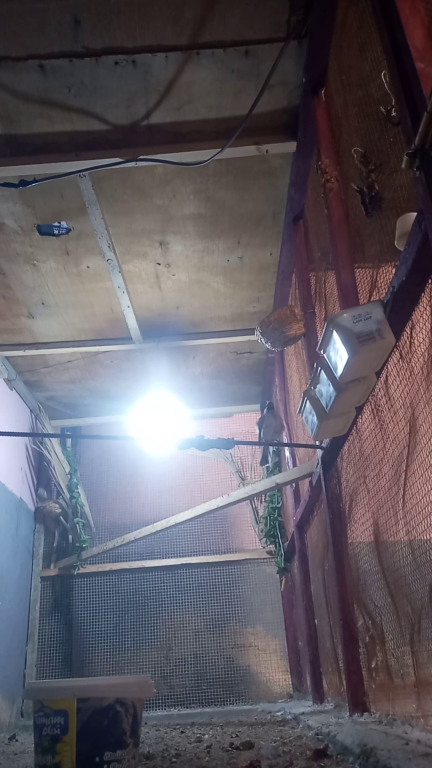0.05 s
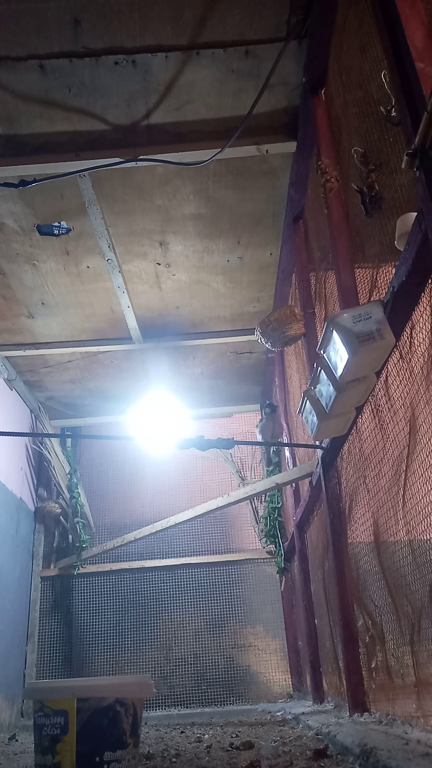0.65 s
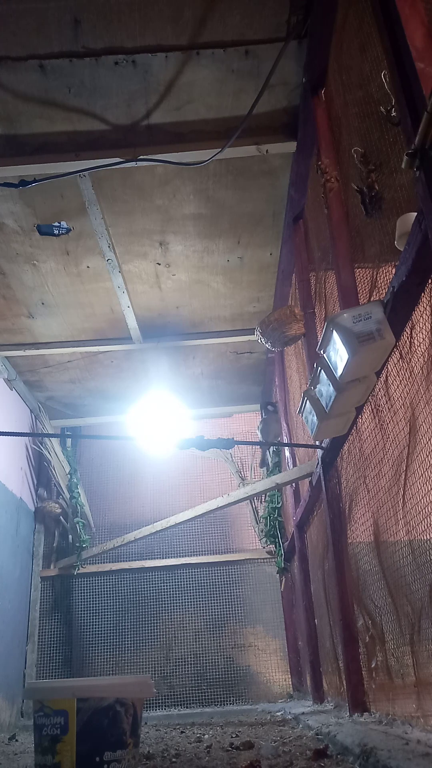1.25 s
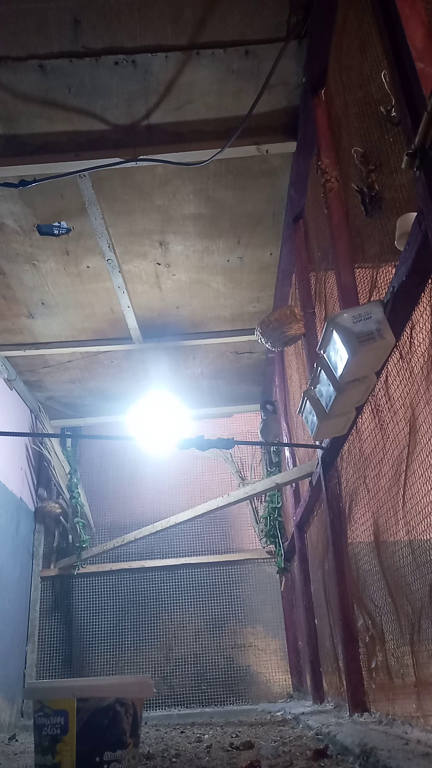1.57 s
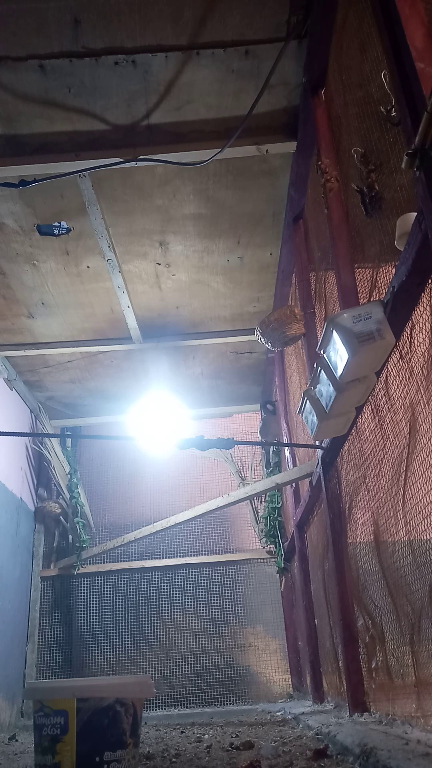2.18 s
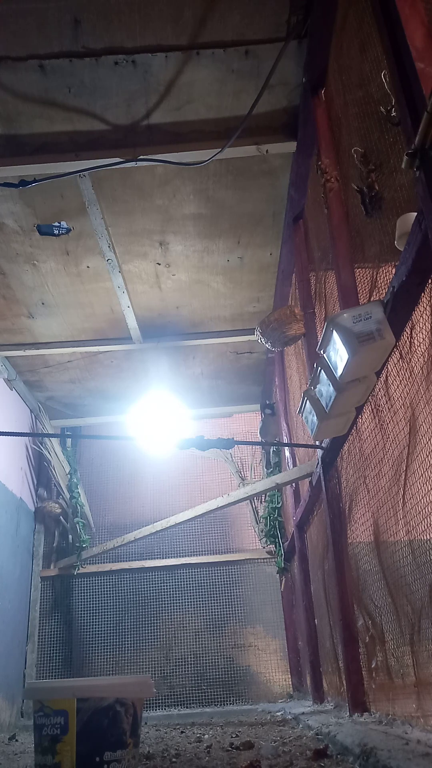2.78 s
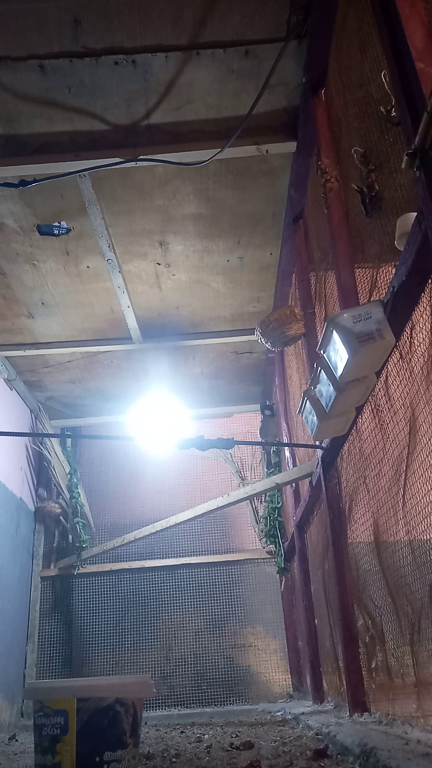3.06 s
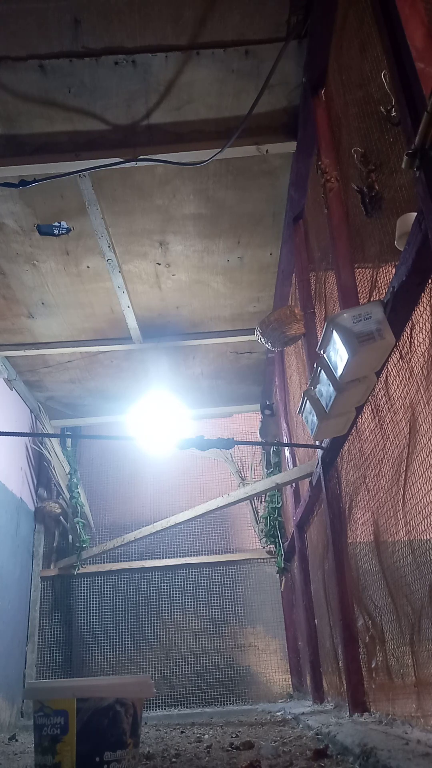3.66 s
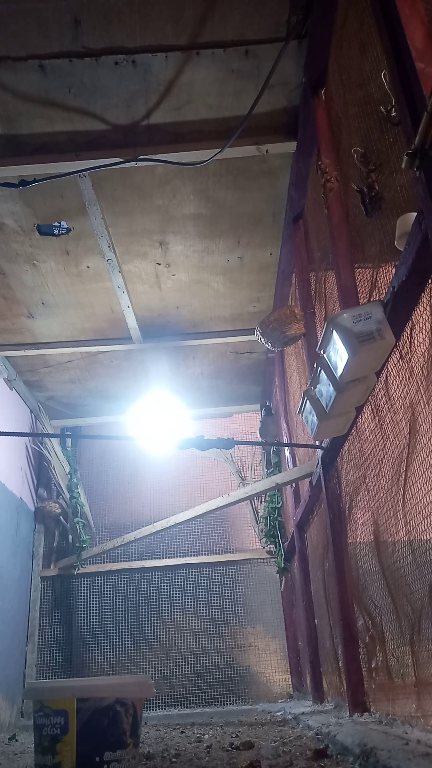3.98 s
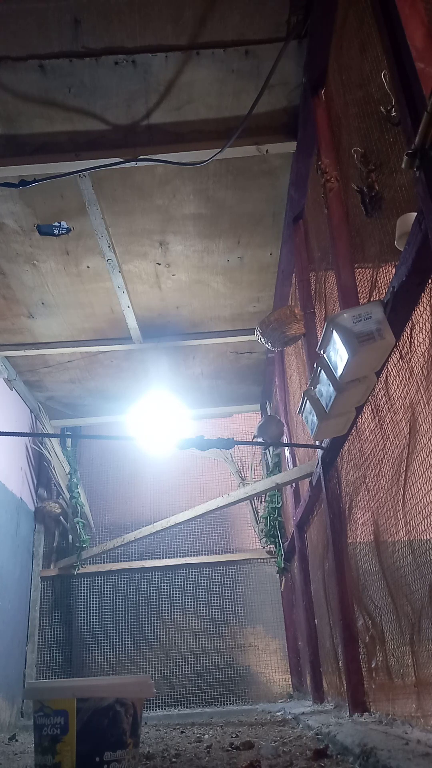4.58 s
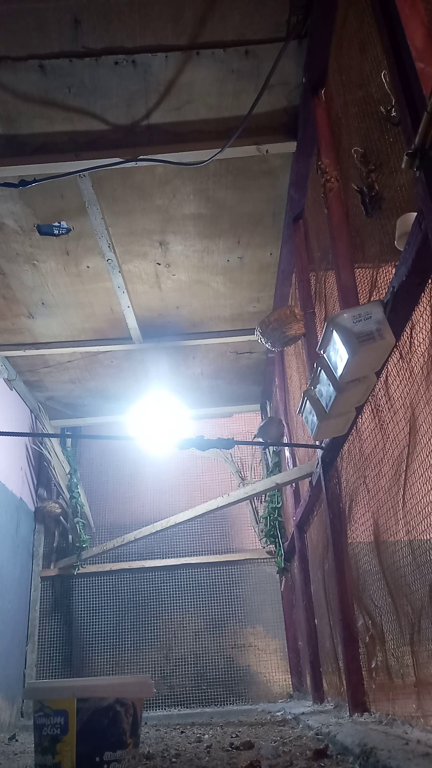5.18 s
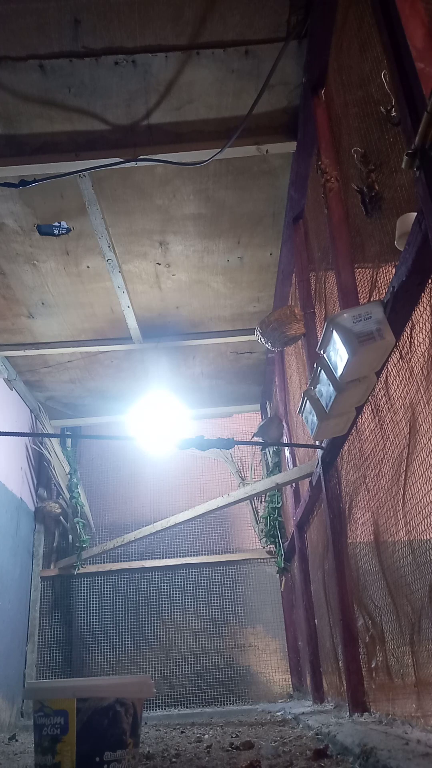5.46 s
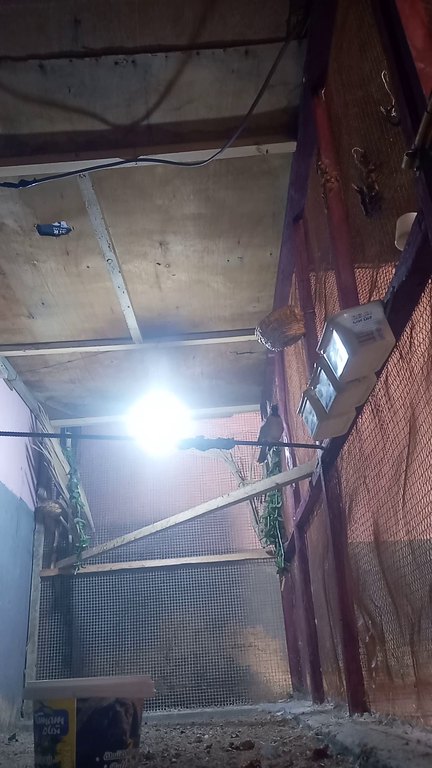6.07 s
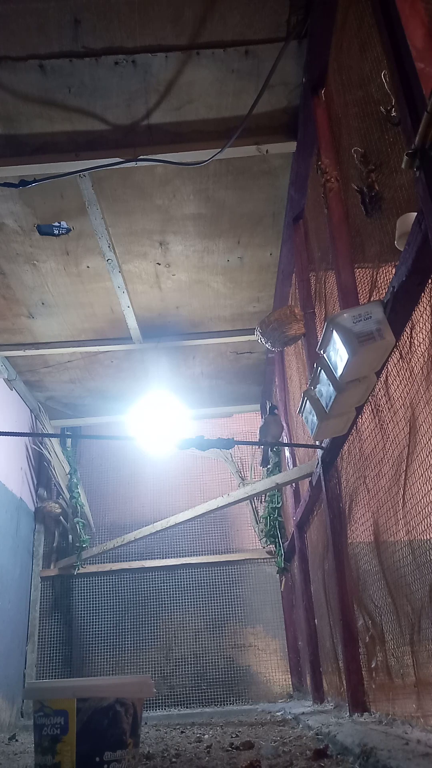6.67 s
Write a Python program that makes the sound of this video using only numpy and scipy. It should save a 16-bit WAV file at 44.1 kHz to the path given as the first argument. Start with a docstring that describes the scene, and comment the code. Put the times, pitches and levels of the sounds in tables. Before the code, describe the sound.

A low electrical hum swells and fades about once a second throughout, over faint rumble and room air in a hard-walled indoor aviary. From 0.1 to 0.5 seconds wings flutter softly, with a few light ticks like claws on a perch. A thin, harsh, falling chirp sounds further off at 0.4 seconds. From 1.1 to 1.7 seconds a close bird whistles one quick phrase, by far the loudest sound, rasping in the middle and ending on two pure rising notes. The quieter falling chirps return at about 2.5, 3.7, 4.5 and 5.9 seconds, with very faint cheeps between them. Distant coos and whistles come at 3.5 seconds and from 5 to 5.8 seconds, and a fainter wing flutter at 5.4. A last faint cheep follows at 6.6 seconds. Everything leans left, and the calls carry a short echo.

```python
"""A hard-walled indoor aviary. Close by, a bulbul whistles one loud, quick phrase, pure on the high
notes and rasping where its membranes flutter. Further off come five thin, harsh falling chirps, both
sides of the syrinx sounding at once, and faint cheeps and coos. Wings flutter twice, with a few light
ticks. Underneath, a low electrical hum swells and fades about once a second over rumble and room air.
Everything leans left, and an automatic gain control ducks the mix under the phrase."""
import sys
import numpy as np
from scipy import signal
from scipy.fft import rfft, irfft
from scipy.io import wavfile
from scipy.ndimage import uniform_filter1d

SR = 44100
rng = np.random.default_rng(int(sys.argv[2]) if len(sys.argv) > 2 else 0)


def master_out(mix):
    """Clip the mix to full scale and print it as 16-bit PCM to the path in sys.argv[1]."""
    frames = np.transpose(np.atleast_2d(mix))
    ceiling = np.clip(frames, -1, 1)
    pcm = np.round(ceiling * 32767).astype(np.int16)
    wavfile.write(sys.argv[1], SR, pcm)


N = 305602
TIME = np.arange(N) / SR

# The bulbul's phrase, one syllable a row; roughness runs from 0 to 1:
# start_s, length_s, slide_s, bend_s, opening_hz, held_hz, closing_hz, level_db, roughness
SYLLABLES = [ (1.131, .068, .023, 0.02, 2536, 1627, 1564, -16.5, 0.06),
             (1.294, .043, .017, .020, 1986, 2121, 1310, -1, 0.09),
             (1.339, 0.037, 0.0083, 0.023, 2750, 2200, 2102, -1.5, 0.75),
             (1.368, .034, .010, .010, 1900, 1621, 1540, -2.5, 0.52),
             (1.517, 0.038, 0.02, 0.01, 2684, 2100, 2190, 4, .8),
             (1.556, 0.038, 0.0075, 0.018, 2140, 1967, 1544, -2, 0.7),
             (1.587, 0.083, .017, .030, 1752, 2888, 2856, 2, 0.06),
             (1.677, 0.061, 0.031, 0.022, 1218, 2734, 3127, 4.5, 0.07)]
# How strongly throat and beak pass an overtone: frequency_hz, gain_db
THROAT_EQ = [(3000, -28.5), (3500, -30.5), (4300, -33.5), (5000, -49.5), (5800, -41), (6600, -41),
             (7600, -51), (8600, -53.5), (10000, -56), (11300, -37), (12300, -59), (15000, -46)]
# Colour of the breath in rough syllables: frequency_hz, gain_db
BREATH_EQ = [(1000, -29.5), (2500, -1.5), (4300, 0), (5500, -2), (6700, -2.5), (9000, -23), (11500, -21.5),
             (13500, -26), (15500, -28)]
# Harsh chirps, with the lower voice's basic slide:
# start_s, length_s, lead_in_s, level_db, opening_hz, held_hz
CHIRPS = [(.362, 0.11, 0.0077, -36.5, 4810, 3716), (2.471, 0.14, .007, -36.5, 4907, 3660),
          (3.7, .148, 0.0096, -39.5, 4630, 3430), (4.531, .146, 0.0119, -36, 4804, 3690),
          (5.862, 0.14, .013, -37.5, 4830, 3645)]
# A far bird's thin cheeps: start_s, level_db
CHEEPS = [(0.827, -70), (1.465, -41), (2.211, -70), (4.04, -70), (4.958, -69.5), (6.23, -72.5),
          (6.569, -57)]
# Far coos and whistles, nearly level in pitch: start_s, length_s, pitch_hz, level_db
FAR_CALLS = [(3.49, 0.35, 630, -66), (5.052, .14, 775, -63), (5.223, 0.47, 785, -65.5),
             (5.448, 0.095, 1870, -67.5), (5.688, 0.094, 2470, -63.5), (5.75, 0.055, 2150, -62)]
# Swells of wing noise; the last two run together: start_s, length_s, peak_db
FLUTTERS = [(0.138, .40, -46.5), (5.285, 0.11, -70), (5.366, 0.13, -59.5)]
# Colour of feathers brushing the air: frequency_hz, gain_db
WING_EQ = [(60, -34), (130, -8), (300, -25), (450, -21), (700, -18), (1100, -28.5), (1600, -20.5),
           (3500, -20.5), (7400, -25.5), (8300, -45), (11000, -49.5), (13500, -58), (15500, -38)]
# Light ticks, as of claws on a perch: start_s, level_db
TICKS = [(0.306, -56), (0.328, -65), (0.536, -54.5)]
# Partials of the mains hum: harmonic_number, gain_db
HUM_PARTIALS = [(1, -29), (2, -1), (3, -17), (4, -31.5)]
# Swells of the hum: start_s, end_s, rise_s, fall_s, level_db
HUM_SWELLS = [(.13, 0.965, .12, .26, -49.5), (1.04, 1.63, .17, 0.15, -48), (1.889, 2.85, .23, .16, -49.5),
              (2.81, 3.87, .31, 0.27, -48.5), (4.03, 4.72, .09, .18, -47.5), (4.92, 5.81, .19, .31, -48.5),
              (5.831, 6.8, .25, .27, -51), (6.81, 7.6, .13, .2, -50)]
# Colour of the low rumble: frequency_hz, gain_db
RUMBLE_EQ = [(20, -26.5), (45, -5.5), (70, -5), (120, -0.5), (180, -2.5), (260, -20.5), (450, -52)]
# Colour of the room air: frequency_hz, gain_db
AIR_EQ = [(120, -24), (220, -9.5), (400, -13), (600, -16.5), (1100, -20.5), (2400, -22), (4400, -27.5),
          (6800, -28), (8200, -42), (11000, -40.5), (13800, -36.5), (15000, -29), (15800, -27.5)]
# Time the room takes to die away by 60 dB: frequency_hz, decay_s
ROOM_DECAY = [(300, 0.34), (1500, 0.61), (2800, 0.6), (4500, 0.37), (7000, 0.26), (12000, 0.33)]


def bulbul(jitter=.05, burr_hz=270, burr_swing=.045, burr_db=2, clear_hz=2300, leak_db=-28, hiss_db=-32):
    """A whistle, pure on the high notes; on the rough ones the membranes flutter and air hisses past."""
    voice, breath, undertone = np.zeros((3, N))
    for start, length, *shape in SYLLABLES:
        i = span(start, start + length)
        hz, db, rough = syllable(TIME[i] - start, *shape)
        burr = np.sin(phase_of(burr_hz * (1 + .31 * drift(100, len(i)))))
        phase = phase_of(hz * (1 + rough * (burr_swing * burr + jitter * drift(210, len(i)))))
        level = from_db(db + burr_db * rough * (burr - 3.5)) * fades(TIME[i], .002)
        # rough notes are richer in overtones
        overtones = sum(from_db(at_hz(THROAT_EQ, k * hz) + 6 * rough - 3 * (k - 2)) * np.sin(k * phase)
                        for k in range(2, 7))
        # low notes alternate strong and weak cycles, which adds partials at half multiples
        lowness = ramp(clear_hz - hz, 1000)
        voice[i] += level * (np.sin(phase) + overtones + lowness * from_db(-25) * np.sin(1.5 * phase))
        undertone[i] += level * lowness * from_db(-41) * np.sin(phase / 2)
        # a little air always leaks; it bursts at the roughest moments
        breath[i] += level * (rough ** 3 + from_db(leak_db))
    hiss = from_db(hiss_db) * breath * noise(BREATH_EQ, correlation=.9)[0]
    hiss = wall_bounce(hiss, delay_s=.0018, echo_db=-1.5)
    return band_pass(voice, 1200, 13000, order=6) + undertone + hiss


def syllable(t, slide_s, bend_s, opening_hz, held_hz, closing_hz, db, rough,
             onset_db=19.5, sag_db_per_s=18.5, release_db=15, crack_octaves=.3):
    """Pitch, level and roughness of a note that slides in, holds and bends away."""
    sliding = 1 - ramp(t, slide_s)
    closing = 1 - ramp(t[-1] - t, bend_s)
    hz = held_hz + (opening_hz - held_hz) * sliding ** 4 + (closing_hz - held_hz) * closing
    envelope_db = -onset_db * sliding ** 1.3 - sag_db_per_s * t - release_db * closing ** 2
    crack = .83 * ramp(np.log2(held_hz / hz), crack_octaves)   # the voice cracks below the held pitch
    return hz, db + envelope_db, rough + (1 - rough) * crack


def chirps(jitter=.031, buzz_hz=260, buzz_swing=.056, pulse_db=4, break_s=.02, release_s=.043,
           lower_slide_s=.066, upper_end_hz=3845):
    """Both sides of the syrinx slide down together; a thin lead-in breaks into an uneven buzz."""
    out = np.zeros(N)
    for start, length, lead_s, level_db, opening_hz, held_hz in CHIRPS:
        i = span(start, start + length)
        t = TIME[i] - start
        progress = ramp(t, length)
        lead_in = 1 - ramp(t - lead_s, break_s)
        release = 1 - ramp(length - t, release_s)
        lower_hz = glide(ramp(t, lower_slide_s), opening_hz, held_hz, curve=.92)
        lower_hz *= 1 - .14 * (progress - .5) - .16 * release   # sinks throughout, drops at the end
        upper_hz = glide(progress, 1.082 * opening_hz, upper_end_hz, curve=.65)
        upper_hz *= 1 + .14 * lead_in   # sharp until the buzz breaks in
        db = level_db - 9.5 * lead_in - 3 * (1 - progress) - 9 * release   # starts soft, grows, lets go
        harsh = np.maximum(1 - lead_in, .4)
        for hz, voice_db in ((lower_hz, -7 * (1 - harsh)), (upper_hz, -6.5 * harsh)):
            buzz = np.sin(phase_of(buzz_hz * (1 + .27 * drift(156, len(i)))))
            phase = phase_of(hz * (1 + harsh * (buzz_swing * buzz + jitter * drift(250, len(i)))))
            flicker_db = pulse_db * harsh * drift(110, len(i))
            out[i] += np.sin(phase) * from_db(db + voice_db + flicker_db) * fades(TIME[i], .006)
    return wall_bounce(band_pass(out, 2400, 5800, order=4), delay_s=.0019, echo_db=-7.5)


def far_calls(cheep_s=.125, cheep_from_hz=4674, cheep_to_hz=4076, sag=.043):
    """Faint falling cheeps, with coos and whistles that droop only a little."""
    cheeps = sum(slur(start, cheep_s, cheep_from_hz, cheep_to_hz, db, rasp=.075) for start, db in CHEEPS)
    coos = sum(slur(start, length, hz, hz * (1 - sag), db, rasp=.06)
               for start, length, hz, db in FAR_CALLS)
    return cheeps + coos


def slur(start, length, from_hz, to_hz, db, rasp):
    """One soft, slightly hoarse gliding note; low notes waver more slowly."""
    out, i = np.zeros(N), span(start, start + length)
    hz = np.geomspace(from_hz, to_hz, len(i)) * (1 + rasp * drift(.08 * from_hz, len(i)))
    out[i] = from_db(db) * np.sin(phase_of(hz)) * fades(TIME[i], length / 4)
    return out


def wings(beat_hz=29, beat_db=1, grain_db=3.5):
    """Feathers brush the air in quick, grainy beats."""
    level = np.zeros(N)
    for start, length, db in FLUTTERS:
        i = span(start, start + length)
        beats = beat_db * np.cos(2 * np.pi * beat_hz * (TIME[i] - start - length / 2))
        level[i] += from_db(db + beats) * fades(TIME[i], length / 2)
    return noise(WING_EQ, correlation=.14) * level * from_db(grain_db * drift(320))


def ticks(decay_s=.0051):
    """Short, dry contacts, each a bright snap of noise."""
    bursts = sum(from_db(db) * (TIME >= start) * np.exp(-np.abs(TIME - start) / decay_s)
                 for start, db in TICKS)
    return band_pass(bursts * rng.standard_normal(N), 2500, 8500, order=2)


def hum(mains_hz=50.55, wobble=.005, flicker_db=1.6, steady_db=-49, follow=.4565):
    """Mains harmonics: the second swells deeply, the weaker ones follow it only in part."""
    swell_db = hum_swell_db()
    phase = phase_of(mains_hz * (1 + wobble * drift(8.7)))
    out = np.zeros(N)
    for k, gain_db in HUM_PARTIALS:
        db = swell_db if k == 2 else steady_db + follow * (swell_db - steady_db)
        level = from_db(db + gain_db + flicker_db * drift(14))
        out += level * np.sin(k * phase + rng.uniform(0, 2 * np.pi))
    return np.sqrt(2) * out


def hum_swell_db(lull_db=-69):
    """Each swell rises out of the lull, holds and sinks back."""
    return lull_db + sum((db - lull_db) * ramp(TIME - start, rise) * ramp(end - TIME, fall)
                         for start, end, rise, fall, db in HUM_SWELLS)


def room_tone(rumble_db=-64, follow=.38, air_db=-68.42):
    """A bed of steady air, and a low rumble that rises with the hum."""
    swell_db = hum_swell_db()
    lift_db = follow * (swell_db - swell_db.mean())
    rumble = noise(RUMBLE_EQ, correlation=.21) * from_db(rumble_db + lift_db)
    return rumble + noise(AIR_EQ, correlation=.033) * from_db(air_db)


def room_tail(predelay_s=.004, build_s=.0074):
    """Dense echoes of the hard walls: they build up quickly and ring longest in the mids."""
    t = TIME[:SR]
    edges_hz = np.geomspace(200, 16000, 11)
    tail = np.zeros((2, SR))
    for low, high in zip(edges_hz, edges_hz[1:]):
        band = band_pass(rng.standard_normal((2, SR)), low, high, order=2)
        tail += band * from_db(-60 * t / at_hz(ROOM_DECAY, np.sqrt(low * high)))
    spectrum = rfft(tail * ramp(t - predelay_s, build_s))
    # the walls return about equal power across the spectrum
    power = uniform_filter1d(np.abs(spectrum) ** 2, size=120, axis=1)
    tail = irfft(spectrum / np.sqrt(power + 1e-12), SR)
    return tail * fades(t, .004) * ramp(1 - t, .12) ** 2


def in_room(x, direct_db, reverb_db):
    """Direct sound and the room's stereo answer."""
    reverb = signal.fftconvolve(x[None], room_tail(), axes=1)[:, :N]
    return from_db(direct_db) * x + from_db(reverb_db) * reverb


def wall_bounce(x, delay_s, echo_db):
    """A reflection from a nearby wall combs the spectrum."""
    return x + from_db(echo_db) * np.interp(TIME - delay_s, TIME, x)


def noise(eq, correlation):
    """Stereo noise at unit power, with a given colour and left-right likeness."""
    gain = from_db(at_hz(eq, np.fft.rfftfreq(N, 1 / SR)))
    mid, side = irfft(rfft(rng.standard_normal((2, N))) * gain, N)
    return unit_rms(np.sqrt(1 + correlation) * mid + np.sqrt(1 - correlation) * side * [[1], [-1]])


def drift(rate_hz, size=N):
    """Smooth random modulation at unit power, moving at about the given rate."""
    pole = np.exp(-2 * np.pi * rate_hz / SR)
    smooth = signal.lfilter([1], [1, -2 * pole, pole * pole], rng.standard_normal(size + SR))
    return unit_rms(smooth[SR:])


def glide(progress, from_hz, to_hz, curve):
    """Slide between two pitches; a curve below 1 covers most of the way late."""
    return to_hz + (from_hz - to_hz) * (1 - progress) ** curve


def phase_of(hz):
    """Running phase of a moving pitch."""
    return 2 * np.pi * np.cumsum(hz) / SR


def ramp(x, length):
    """Rise from 0 to 1 over the given length, then hold."""
    return np.clip(x / length, 0, 1)


def fades(t, edge_s):
    """Soft fade in and out."""
    return np.sin(np.pi / 2 * ramp(np.minimum(t - t[0], t[-1] - t), edge_s)) ** 2


def span(start_s, end_s):
    """Sample indices between two times."""
    return np.arange(int(start_s * SR), min(N, int(end_s * SR)))


def band_pass(x, low_hz, high_hz, order):
    """Keep one band."""
    sos = signal.butter(order, [low_hz, high_hz], "band", fs=SR, output="sos")
    return signal.sosfilt(sos, x + 1e-18)


def at_hz(table, hz):
    """Read a table on a log-frequency axis."""
    knots, values = np.transpose(table)
    return np.interp(np.log(np.maximum(hz, 1)), np.log(knots), values)


def pan(x, left_db):
    """Make the left side louder than the right."""
    return x * from_db([[left_db / 2], [-left_db / 2]])


def from_db(db):
    """Decibels to gain."""
    return 10 ** (np.asarray(db) / 20)


def unit_rms(x):
    """Scale to unit power."""
    return x / np.sqrt(np.mean(x ** 2) + 1e-20)


def scene():
    """The bulbul up front, other birds deeper in the reverb, hum beneath; all lean left."""
    near = pan(in_room(bulbul(), direct_db=-2.5, reverb_db=-6.5), left_db=9)
    further = pan(in_room(chirps() + far_calls(), direct_db=-6.5, reverb_db=-2.5), left_db=4.5)
    movement = pan(wings() + in_room(ticks(), direct_db=1, reverb_db=-8), left_db=8.5)
    return near + further + movement + pan(hum(), left_db=6) + pan(room_tone(), left_db=5.5)


def record(dry, left_lag_samples=37, threshold_db=-12, squeeze=.6, attack_s=.0011,
           release_db_per_s=90, cutoff_hz=15700):
    """The left side runs slightly late; gain ducks on peaks and recovers steadily; the top is cut."""
    stereo = np.array([np.interp(TIME - left_lag_samples / SR, TIME, dry[0]), dry[1]])
    peak_db = 20 * np.log10(np.abs(stereo).max(axis=0) + 1e-9)
    cut_db = squeeze * np.maximum(peak_db - threshold_db, 0)
    recovery_db = release_db_per_s * TIME
    held_db = np.maximum.accumulate(cut_db + recovery_db) - recovery_db
    pole = np.exp(-1 / (attack_s * SR))
    duck_db = signal.lfilter([1 - pole], [1, -pole], held_db)
    high_cut = signal.ellip(12, .1, 90, cutoff_hz, fs=SR, output="sos")
    return signal.sosfilt(high_cut, stereo * from_db(-duck_db))


dry = scene()
out = record(dry)
master_out(out)
```